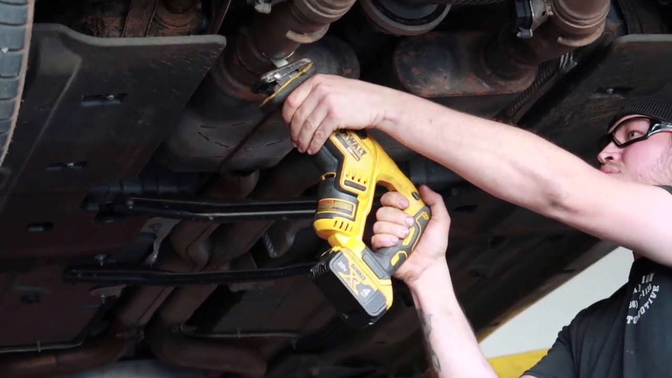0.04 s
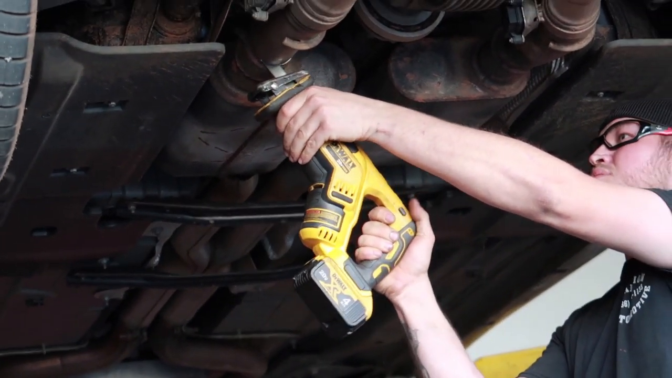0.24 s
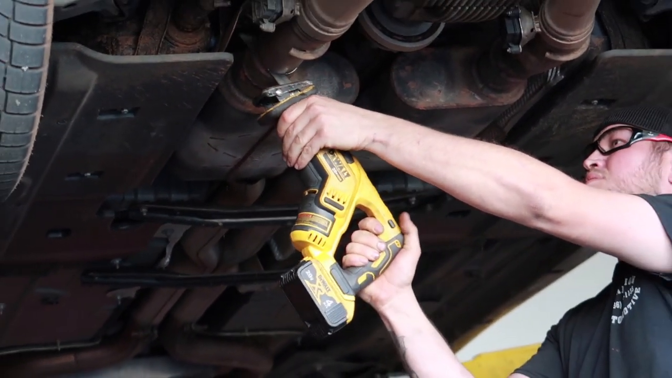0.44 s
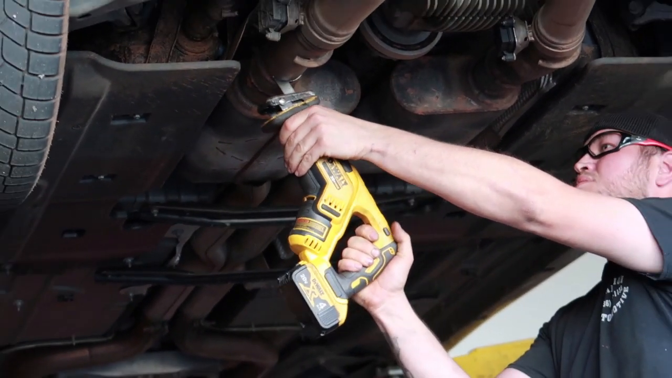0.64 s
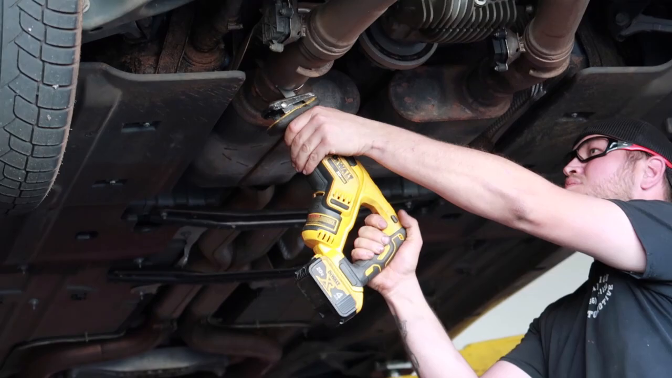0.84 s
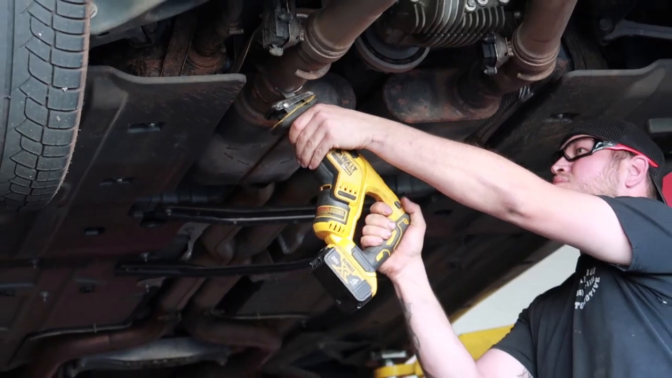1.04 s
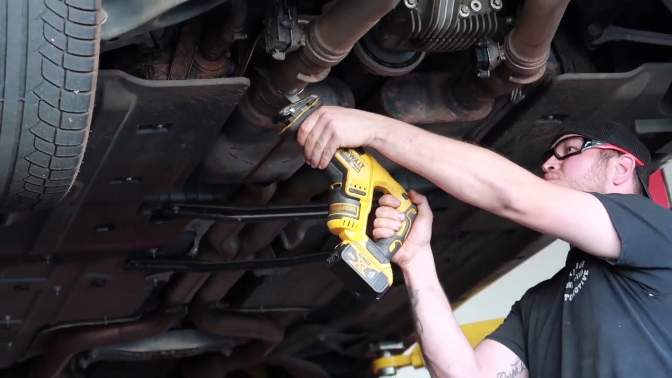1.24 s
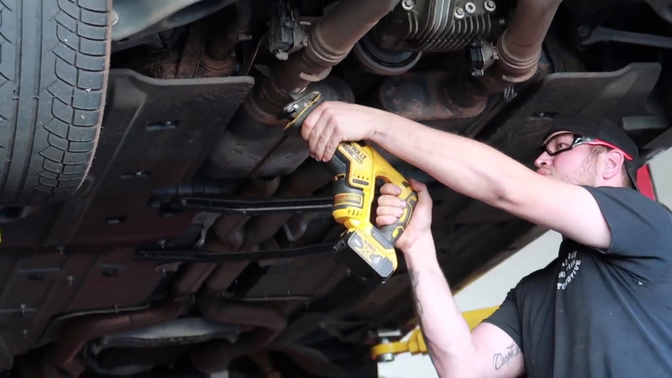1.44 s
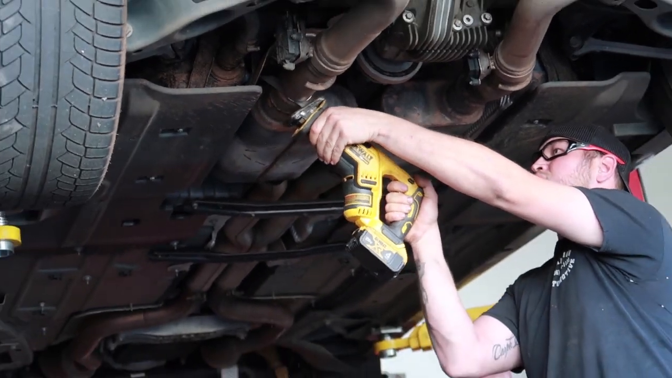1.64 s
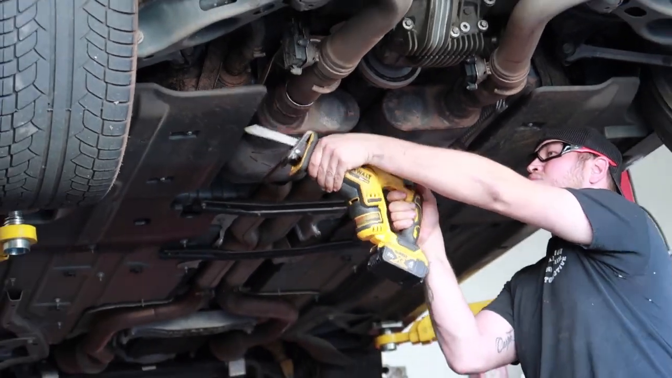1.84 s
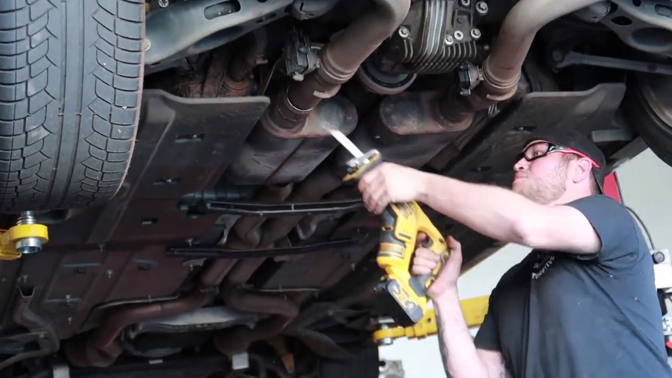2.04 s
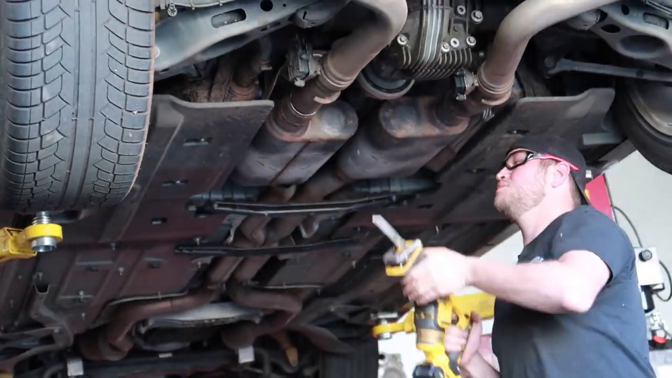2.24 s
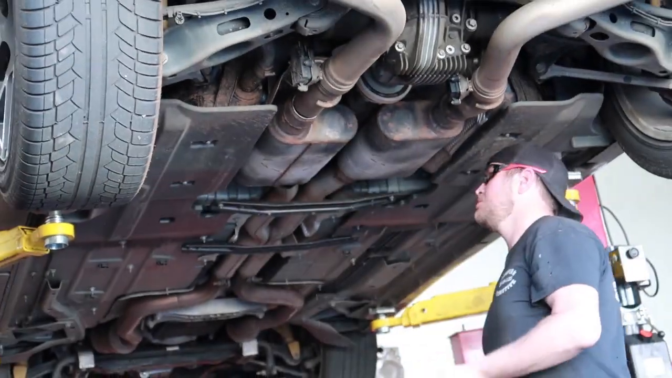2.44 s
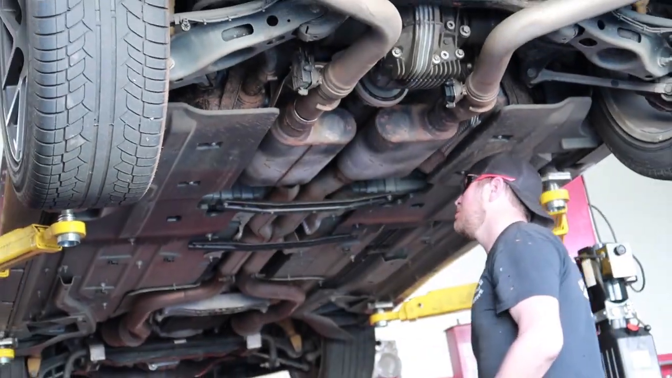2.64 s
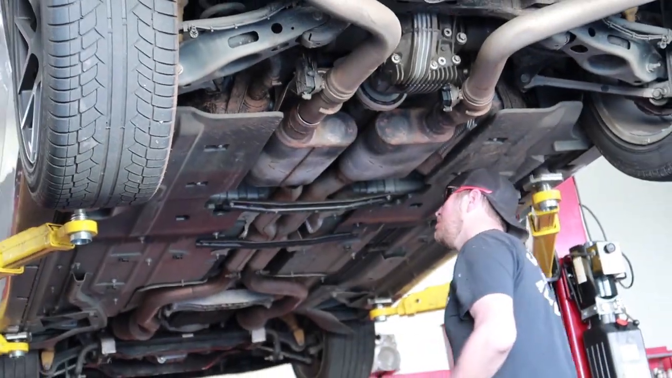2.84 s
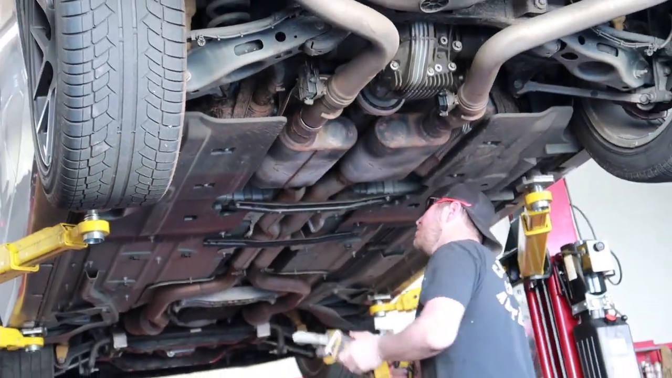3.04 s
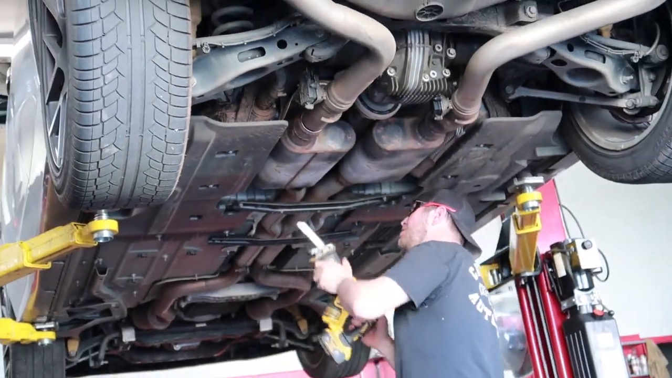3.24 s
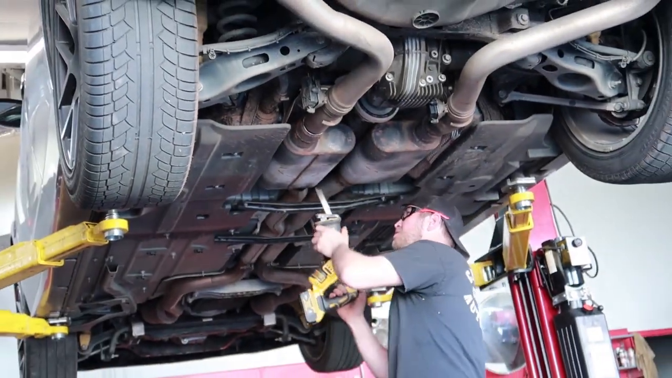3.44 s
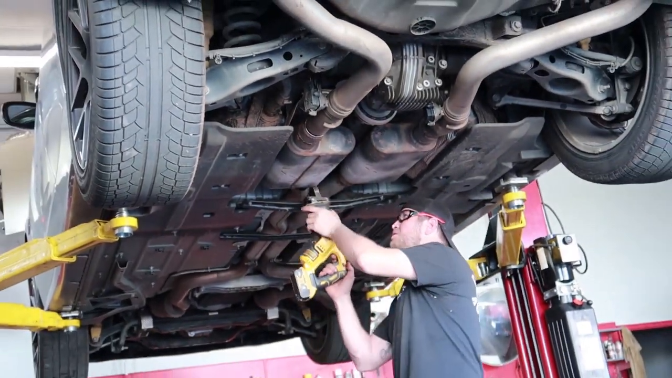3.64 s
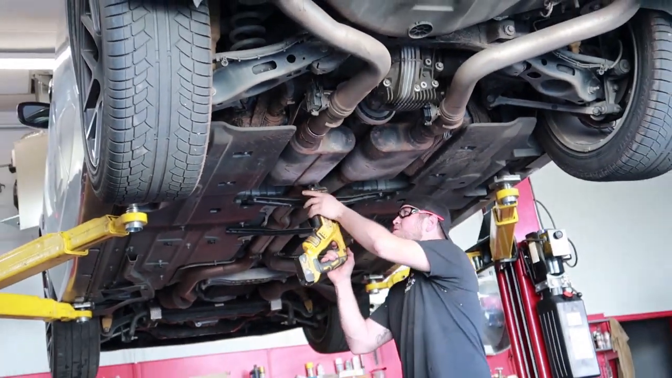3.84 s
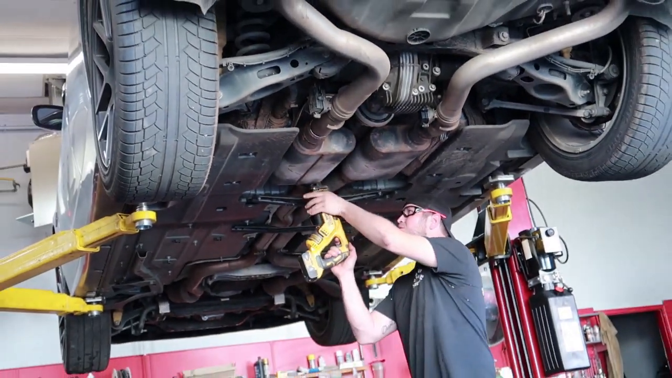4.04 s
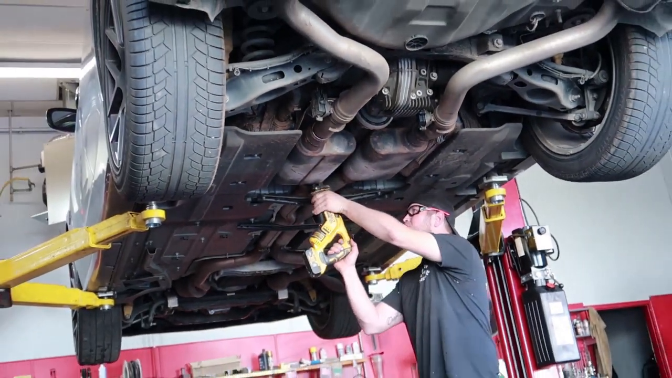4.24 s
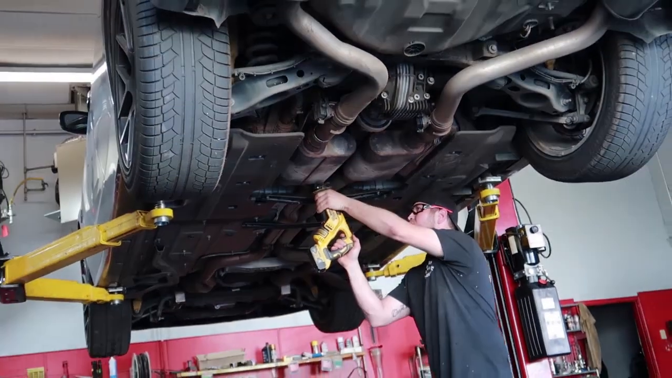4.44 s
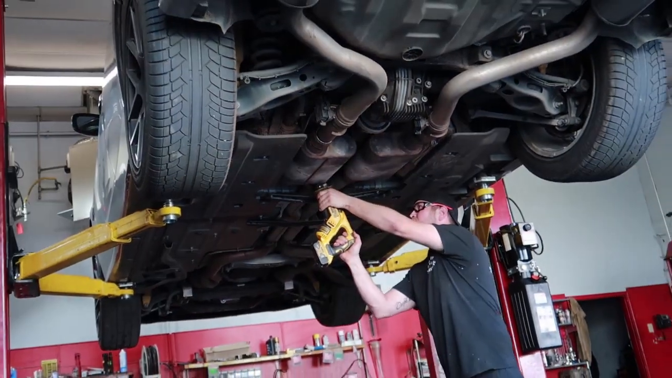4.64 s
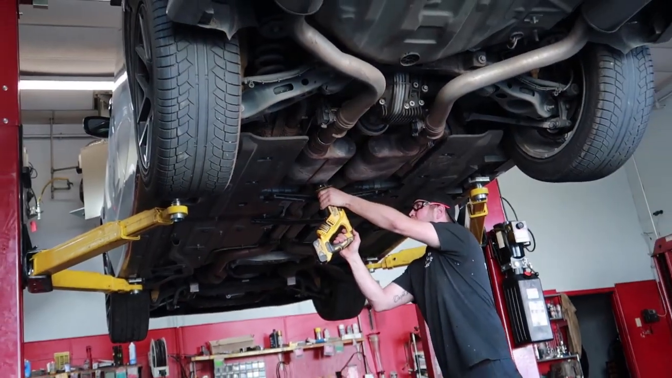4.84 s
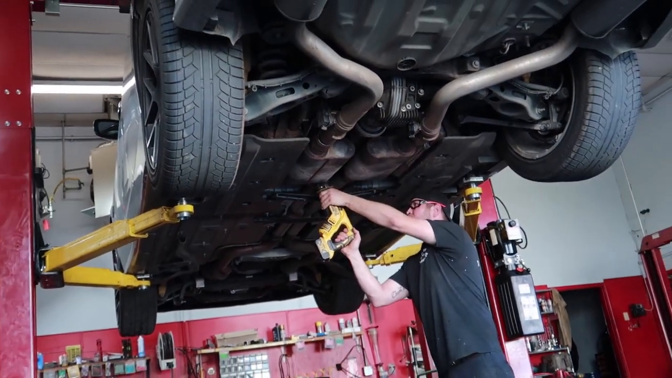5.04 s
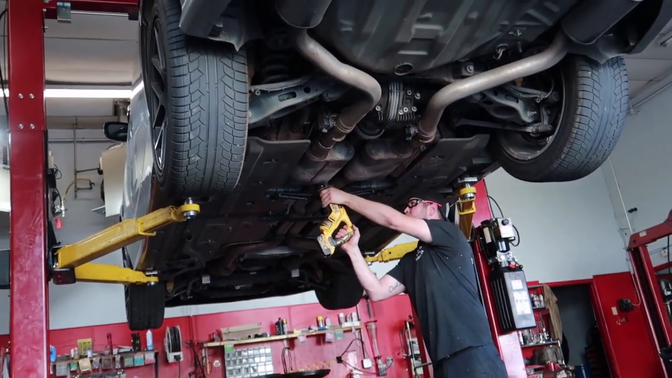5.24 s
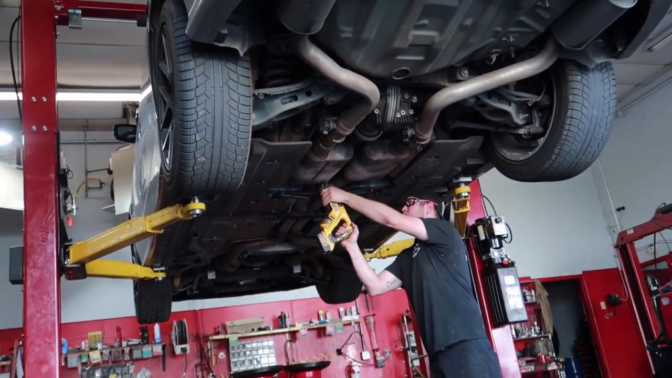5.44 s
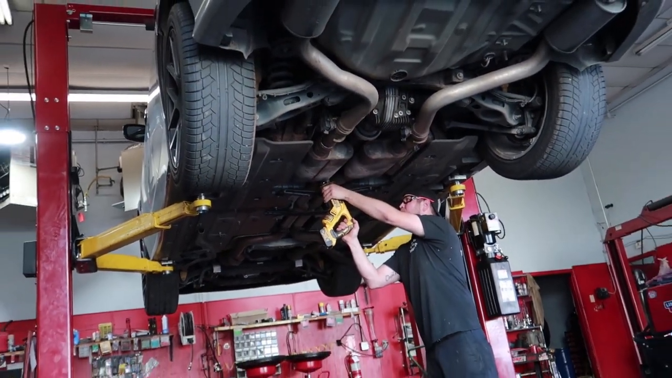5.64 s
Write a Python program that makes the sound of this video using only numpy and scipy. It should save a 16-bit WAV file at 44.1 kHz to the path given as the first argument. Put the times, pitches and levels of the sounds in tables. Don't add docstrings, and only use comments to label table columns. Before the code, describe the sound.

From 0 to about 1.85 s a reciprocating saw cuts a steel exhaust pipe at close range: a dense, harsh rasp strongest around 2 kHz, pulsing rapidly with the strokes at nearly 40 per second, with squealing catches, tiny skips, hollow pipe body and fine hiss. The car shudders faintly, and a ring near 1 kHz grows. At 1.9 s the pipe parts with slaps and two low knocks, swings and settles by 2.1 s as the saw stops; the metal ring fades over roughly a second. From 2.3 to 3.75 s a distant piston compressor dominates, chugging about 13 turns per second with low whine and air noise, gradually rising. At 3.8 s the blade lightly taps a second pipe, which rings briefly. Short, rough bites burst at 4.4-4.55 and 4.7-4.95 s, with low thuds and ringing gaps. From 5.25 s a new rasping cut builds and continues to the end.

```python
import sys
import numpy as np
from scipy import signal
from scipy.fft import rfft, irfft, next_fast_len
from scipy.io import wavfile
from scipy.ndimage import uniform_filter1d, map_coordinates

SR = 44100
rng = np.random.default_rng(int(sys.argv[2]) if len(sys.argv) > 2 else 0)


def to_wav(s):
    ch = np.atleast_2d(s).T
    pcm = np.round(np.clip(ch, -1, 1) * 32767)
    wavfile.write(sys.argv[1], SR, pcm.astype(np.int16))


def amplitude_ratio(level_db):
    exponent = np.asarray(level_db, float) / 20
    return 10 ** exponent


N = 251800
T = np.arange(N) / SR

# t/s, strokes done, pulsing share of the rasp (0-1)
STROKES = [
    (0, .68, .22),
    (.65, 25.65, .22),
    (1.05, 41.26, .15),
    (1.35, 53.06, .3),
    (1.9, 74.38, .22),
    (5.71, 221, .15),
]
# t/s, feed level/dB, tooth rate f/Hz, slack of the pipe (body over rasp) level/dB
FIRST_CUT = [(0, -17, 2248, -10), (.1, -18.5, 2222, -6), (.26, -19, 2200, -5.5), (.31, -20, 2160, -1),
             (.37, -17, 2200, -4.5), (0.499, -18, 2120, -5), (.62, -17, 1740, 0), (.72, -15, 2110, -9),
             (.83, -17, 1965, -7), (.95, -19.5, 2078, 2), (1.05, -16.5, 1990, -2.5),
             (1.19, -15.5, 1838, -10.5), (1.279, -21.5, 1855, -6.5), (1.36, -22, 2185, -4.5),
             (1.46, -19.5, 2200, -7), (1.57, -17.5, 2124, -4), (1.72, -19, 1880, -2),
             (1.83, -16.5, 1950, 4)]
RUN_OUT = [
    (1.83, -40, 1940, 6),
    (1.899, -27, 1918, 4),
    (1.999, -28.5, 1826, 0),
    (2.14, -31, 2121, 2),
]
TAP = [
    (3.778, -40, 2000, -5),
    (3.792, -23, 2020, -19),
    (3.82, -25.5, 1964, 0),
]
FIRST_BITE = [(4.33, -44, 1657, -1), (4.38, -32.5, 2040, 6), (4.413, -20, 1980, -1), (4.424, -15, 1960, 6),
              (4.46, -14.5, 1960, -2.5), (4.51, -16, 1850, -1), (4.54, -17, 1780, -2.5)]
SECOND_BITE = [(4.705, -34, 1700, 6), (4.734, -20, 1830, 3), (4.77, -16, 1900, 5), (4.8, -13.5, 1880, 5),
               (4.84, -13, 1760, -2), (4.878, -15.5, 1980, -8), (4.91, -11.5, 2180, -12.5),
               (4.955, -16, 1854, -9.5)]
SECOND_CUT = [(5.19, -40, 1916, -3), (5.23, -34, 1960, 0), (5.25, -23.5, 1942, 4), (5.33, -20, 1914, -1),
              (5.4, -18.5, 1986, -5.5), (5.48, -17.5, 2104, -5.5), (5.52, -14, 2152, -7),
              (5.6, -15.5, 2092, -9), (5.71, -14.5, 2090, -15)]
GRAZES = [
    [(3.771, -46, 2000, 0), (3.776, -28, 2000, 11), (3.784, -31, 2000, -7)],
    [(4.285, -61, 1660, 0), (4.293, -51, 1660, 0), (4.32, -48, 1660, -7)],
]
EDGE_DB = [
    0,
    1.3,
    -10.5,
    -2,
    -2.5,
    -2,
    2,
    9,
]
CONTACTS = [FIRST_CUT, RUN_OUT, TAP, FIRST_BITE, SECOND_BITE, SECOND_CUT] + GRAZES
# t/s, level/dB over the rasp
BINDING = [(0, -18), (.19, -32), (.24, -12), (.3, -10), (.42, -9), (.63, -21), (.88, -12), (1.07, -13),
           (1.28, -23.5), (1.8, -12.5), (3.8, -1.5), (4.42, -2.5), (4.55, -9), (4.75, -1.5), (4.95, -16),
           (5.3, -7.5), (5.5, -11), (5.71, -11)]
# f/Hz, width/Hz, level/dB
FIRST_PIPE = [(705, 18, -9), (830, 14, -14), (892, 14, -12), (991, 14, -9), (1140, 14, -9), (1230, 16, -8),
              (1265, 14, -8), (1314, 16, -10), (1500, 16, -9), (1560, 14, -8), (1740, 16, -5),
              (1840, 16, -6), (1965, 16, -5), (2035, 16, -3), (2110, 16, -6), (2170, 16, -4),
              (2198, 14, -2), (2236, 16, -2), (2278, 16, -2), (2435, 18, -6), (2530, 18, -7),
              (2575, 16, -4), (2800, 30, -9), (3420, 80, -14), (3850, 40, -17), (5340, 60, -19),
              (5670, 70, -17), (6130, 70, -21), (6550, 100, -23)]
SECOND_PIPE = [(684, 20, -8), (886, 18, -9), (1140, 16, -7), (1340, 16, -5), (1460, 18, -8), (1560, 16, -6),
               (1630, 18, -8), (1768, 16, -2), (1830, 16, -3), (1900, 16, -2), (1960, 16, -3),
               (2043, 16, -3), (2126, 16, -4), (2228, 16, -1), (2267, 16, -2), (2450, 30, -6),
               (3220, 60, -11), (3860, 60, -15), (4470, 40, -17), (4770, 40, -17), (6060, 70, -23)]
# f/Hz, density level/dB per Hz
RASP_SPECTRUM = [(240, -42), (400, -5.5), (586, -2), (694, -8.5), (761, -5), (1000, -4), (1060, -6),
                 (1300, -1), (1400, 4), (2220, -3), (4220, -24), (5470, -24), (11800, -31), (15500, -43)]
# t/s, half length/s, level/dB
SHUDDERS = [
    (0.102, 0.23, -47),
    (0.35, 0.15, -47),
    (.82, 0.36, -37),
    (1.409, 0.12, -46),
    (1.801, 0.23, -44),
]
# multiple, level/dB
SHAKE = [(2, -10), (3, -1.5), (5, -3.5)]
# share of the turn, level/dB
VALVES = [(0.122, 9), (0.431, 2), (0.733, 4.5), (0.9, -1)]
# f/Hz, width/Hz, level/dB
TANK = [(192, 16, -7), (258, 22, 0), (305, 22, 0), (357, 20, -5), (385, 16, -7), (600, 30, -13),
        (690, 40, -10), (1265, 60, -14)]
# f/Hz,
# density level/dB per Hz
SHOP_SPECTRUM = [(25, -18), (80, -7.5), (217, -4.5), (307, -2), (483, -17.5), (666, -12), (826, -18.5),
                 (1230, -13), (2250, -25.5), (2800, -23.5), (3150, -32.5), (4300, -38.5), (7500, -45),
                 (8800, -56), (9400, -46), (10000, -40.5), (10700, -46.5), (11300, -54)]
# f/Hz, level/dB re the machine's own level
WHINE = [(191.8, -14), (255.7, -8), (306.8, -8), (358, -13), (383.5, -16), (1265, -19), (1367, -22),
         (1852, -21)]
# t/s, f/Hz, level/dB, t60/s
SEVERED = [
    (1.1, 1800, -42, 0.65),
    (1.3, 1400, -48, 0.47),
    (2.09, 2156, -20, 0.25),
    (2.1, 824, -31.5, 0.7),
    (1.95, 988, -36.5, 4),
]
# t/s of the peak, peak level/dB, f/Hz
SNAGS = [(0.03, -17, 2240.0), (0.068, -11.5, 2210), (0.093, -10.5, 2270), (0.179, -18, 2200),
         (0.198, -23, 2230.0), (0.247, -19, 2210.0), (0.274, -15, 2200), (0.353, -11.5, 2190.0),
         (0.376, -11.5, 2280), (0.459, -16, 2210), (0.531, -12.5, 2200.0), (0.562, -15, 2200.0),
         (0.664, -12, 1970), (0.69, -13, 2190), (0.743, -12.5, 2230), (0.942, -15, 1235), (1.1, -8.5, 2150),
         (1.142, -8.5, 1684), (1.201, -8.0, 1882), (1.254, -14.5, 1953), (1.302, -15, 1720),
         (1.355, -12.5, 2213), (1.406, -13.5, 2220), (1.434, -20, 2210), (1.458, -17, 2210.0),
         (1.489, -15.0, 2220), (1.509, -11.0, 2120), (1.56, -12.5, 2074), (1.614, -12.5, 2210),
         (1.668, -23, 2176), (1.692, -16.5, 1745), (1.741, -18, 2200.0), (1.793, -14, 1258),
         (1.817, -11.5, 1240.0), (1.908, -18.5, 2250), (2.089, -23.5, 1633), (2.106, -20, 2150),
         (2.126, -26, 2170), (3.796, -24, 2015), (3.814, -25, 2030), (3.899, -28, 1360),
         (4.447, -9.5, 1837), (4.505, -11.5, 1465), (4.736, -16.0, 1250), (4.792, -10, 1141),
         (4.835, -14, 1820.0), (4.859, -7.5, 1853), (4.912, -13, 1830), (4.942, -6.5, 1830),
         (5.252, -23, 1325), (5.314, -19.5, 1320), (5.444, -14.5, 2058), (5.466, -14.0, 1960.0),
         (5.518, -10.5, 2270), (5.566, -16, 2250), (5.626, -9.5, 1940), (5.644, -12, 1900.0),
         (5.699, -7.0, 2120)]
# t/s, lost level/dB
SKIPS = [(0.075, -5.0), (0.206, -5.0), (0.335, -5.0), (0.647, -7.0), (0.757, -5.0), (0.878, -5.0),
         (1.162, -5.0), (1.182, -6.0), (1.34, -5.0), (1.378, -5.0), (1.417, -5.0), (1.469, -5.0),
         (1.53, -6.0), (1.65, -5.0), (1.703, -6.0), (4.373, -11.0), (4.395, -9.0), (4.413, -6.0),
         (4.706, -10.0), (4.725, -5.0), (4.765, -5.0), (4.865, -6.0), (4.934, -6.0), (4.986, -5.0),
         (5.237, -7.0), (5.297, -5.0), (5.49, -5.0), (5.535, -5.0), (5.658, -7.0), (5.709, -7.0)]
# t/s, peak level/dB
TICKS = [
    (1.8338, -21),
    (1.8966, -18),
    (1.962, -33),
    (1.9814, -33),
    (2.0105, -31),
    (3.868, -45),
    (4.2485, -54),
]
# t/s, peak level/dB, f/Hz
THUDS = [
    (1.899, -9, 355),
    (1.919, -8.5, 261),
    (1.959, -15.5, 285),
    (2.038, -20.5, 268.5),
    (2.089, -21.5, 244),
    (4.429, -32, 317.6),
    (4.761, -15, 332.6),
    (4.789, -26, 434),
    (4.899, -22, 353),
    (5.238, -19.5, 338.5),
]
# f/Hz, correlation
NEAR_ALIKE = [(60, 1.0), (120, 1.0), (240, 1), (480, 1), (950, 1), (1890, 0.96), (3770, 0.88), (7520, 0.47),
              (15000, 0.031)]
FAR_ALIKE = [(60, 1), (180, 1), (550, 0.98), (1650, 0.91), (4970, 0.21), (15000, -0.96)]

PARTS_S, SECOND_PIPE_S = 1.89, 3
SETTLES_S = SECOND_CUT[1][0]
USUAL_FEED_DB = -17
RASP_T60, BODY_T60, LOW_FIZZ_T60, HISS_T60, HIGH_FIZZ_T60 = 0.49, 0.92, 0.51, 0.14, 0.25


def unit(x):
    return x / np.sqrt(np.mean(x ** 2) + 1e-20)


def along(points, hz):
    f, v = np.transpose(points)
    return np.interp(np.log(hz + 1), np.log(f + 1), v)


def curves(rows):
    s, *columns = np.transpose(rows)
    return [np.interp(T, s, column) for column in columns]


def wobble(rate):
    coarse = np.arange(0, N + 16, 16)
    knots = rng.standard_normal(int(N * rate / SR) + 5)
    return np.interp(np.arange(N), coarse, map_coordinates(knots, [coarse * rate / SR]))


def filtered(x, response):
    m = next_fast_len(N + SR // 4)
    return irfft(rfft(x, m) * response(np.fft.rfftfreq(m, 1 / SR)), m)[..., :N]


def modes(table, f):
    total = 0
    for k, (centre, width, db) in enumerate(table):
        resonance = 1j * f * width / (centre ** 2 - f ** 2 + 1j * f * width)
        total = total + (-1) ** k * amplitude_ratio(db) * resonance
    return total


def band(f, lo_hz, hi_hz):
    return 1 / np.sqrt((1 + (lo_hz / (f + 1)) ** 8) * (1 + (f / hi_hz) ** 8))


def tail(t60):
    t = np.arange(round(t60 * SR)) / SR
    answer = rng.standard_normal(len(t)) * amplitude_ratio(-60 * t / t60)
    return answer / np.linalg.norm(answer)


def smeared(x, t60, hold):
    hop = round(hold * SR)
    padded = np.pad(x, (hop, 2 * hop))
    out = np.zeros(N + 4 * hop + SR)
    fade = np.sin(np.pi * np.arange(2 * hop) / (2 * hop))
    for start in range(0, N + hop, hop):
        answer = signal.fftconvolve(padded[start:start + 2 * hop] * fade, tail(t60))
        out[start:start + len(answer)] += answer
    return out[hop:hop + N]


def patchy(x, depth_db):
    z = signal.stft(x, nperseg=1024)[2]
    field = rng.standard_normal(z.shape)
    field = uniform_filter1d(uniform_filter1d(field, 5, 0), 12, 1)
    return signal.istft(z * amplitude_ratio(depth_db * unit(field)), nperseg=1024)[1][:N]


def evened(x):
    window_s, share = .03, .75
    power = np.abs(uniform_filter1d(x ** 2, round(window_s * SR))) + 1e-9
    return unit(x / power ** (share / 2))


def loudness(offset, t60):
    late_db, late_slower = -25, 2.3
    power = 0
    for rows, edge_db in zip(CONTACTS, EDGE_DB):
        s, feed_db, _, slack_db = np.transpose(rows)
        db = np.interp(T, s, offset(feed_db, slack_db, edge_db), left=-200)
        fall_db = 60 * np.maximum(T - s[-1], 0) / t60
        power = power + amplitude_ratio(db - fall_db) ** 2 + amplitude_ratio(db + late_db - fall_db / late_slower) ** 2
    return np.sqrt(power)


def contact():
    held_db, skip_s = -5, .005
    out = np.zeros(N + SR)
    t = np.arange(-SR // 40, SR // 40) / SR
    for s, db in [(s, held_db) for s, _, _ in SNAGS] + SKIPS:
        out[round(s * SR):][:len(t)] += db * np.exp(-(t / skip_s) ** 2)
    return out[SR // 40:][:N]


def chips(rough_db):
    return rng.standard_normal(N) * amplitude_ratio(np.clip(rough_db, 0, 3) * wobble(900))


def through_pipe(drive, lo_hz, hi_hz, ringing, patch_db):
    drive = patchy(drive, patch_db)
    wall = drive + 1.2 * smeared(drive, t60=.15, hold=.3)
    broad = unit(filtered(wall, lambda f: band(f, lo_hz, hi_hz) * amplitude_ratio(along(RASP_SPECTRUM, f))))
    strong = []
    for table in (FIRST_PIPE, SECOND_PIPE):
        inside = [mode for mode in table if lo_hz <= mode[0] < hi_hz]
        strong.append(unit(filtered(drive, lambda f: band(f, lo_hz, hi_hz) * modes(inside, f))))
    return np.cos(ringing) * broad + np.sin(ringing) * np.where(T < SECOND_PIPE_S, *strong)


def tooth_rasp(tooth_hz, fizz, pull, held):
    tooth_phase = 2 * np.pi * np.cumsum(tooth_hz * (1 + .03 * wobble(60))) / SR
    teeth = np.cos(tooth_phase) * wobble(520)
    rasp = through_pipe(.6 * teeth + chips(rough_db=2.5), 1450, 3050, ringing=.8, patch_db=1)

    def colour(f):
        tilt_db = -5.5 * np.log2(np.clip(f, 1000, 4000) / 2000)
        shoulder_db = 11 * np.exp(-((f - 2560) / 190) ** 2)
        return amplitude_ratio(tilt_db + shoulder_db)

    rasp = evened(filtered(rasp, colour))
    first_upper = evened(filtered(rasp + 0.69 * fizz, lambda f: band(f, 2450, 2900)))
    second_upper = evened(filtered(rasp + 0.69 * fizz, lambda f: band(f, 2600, 4600)))
    upper = np.where(T < SECOND_PIPE_S, first_upper, second_upper)
    return pull * (amplitude_ratio(0.94 * held) * rasp + amplitude_ratio(curves(BINDING)[0] + 0.65 * held) * upper)


def pipe_body(pull, held):
    body = pull ** .3 * through_pipe(chips(rough_db=2.5), 660, 1450, ringing=.8, patch_db=1.5)
    drum = unit(filtered(chips(rough_db=3.0), lambda f: band(f, 237, 820)))
    body = body + amplitude_ratio(-8.0) * (T > PARTS_S) * drum
    tilted = filtered(body, lambda f: amplitude_ratio(np.log2(np.clip(f, 600, 1500) / 1000)))
    return amplitude_ratio(0.25 * held) * evened(tilted)


def chip_hiss(pull):
    hiss = pull ** 0.33 * through_pipe(chips(rough_db=4.5), 10000, 19300, ringing=.05, patch_db=-0.5)
    duller = filtered(hiss, lambda f: band(f, 0.99, 13100) ** 2)
    return np.where(T < SECOND_PIPE_S, hiss, amplitude_ratio(1) * duller)


def locked_mode(feed_db, slack_db, pull, held):
    db = feed_db - 6.5 - 6.5 * T - 1.2 * (slack_db + 5)
    db = db + 1.5 * wobble(18) + 2 * wobble(45)
    phase = 2 * np.pi * np.cumsum(2200 + 12 * wobble(9)) / SR + .5 * wobble(40)
    return pull * amplitude_ratio(db + held) * np.sin(phase)


def car_shake(done, boom):
    shudder = sum(amplitude_ratio(db) * np.exp(-((T - s) / half) ** 2) for s, half, db in SHUDDERS)
    shake = sum(amplitude_ratio(db + 2.6 * wobble(11.8)) * np.sin(2 * np.pi * k * done) for k, db in SHAKE)
    rattle = unit(filtered(chips(rough_db=0.0), lambda f: band(f, 274, 460)))
    return shudder * (shake + amplitude_ratio(-0.5) * rattle + amplitude_ratio(-6) * boom)


def saw():
    feed_db, tooth_hz, slack_db = curves(FIRST_CUT + RUN_OUT[1:] + TAP + FIRST_BITE + SECOND_BITE + SECOND_CUT)
    done, depth = curves(STROKES)
    turn = 2 * np.pi * (done - .2)
    depth = np.clip(depth * amplitude_ratio(0.8 * wobble(23.3)), 0, .8)
    pull = 1 + depth * (np.cos(turn) - 0.093 * np.sin(2 * turn))
    held = contact()
    fizz = pull ** .3 * through_pipe(chips(rough_db=2.5), 3050, 7500, ringing=.28, patch_db=1.3)
    low_fizz = filtered(fizz, lambda f: 1 / (1 + (f / 4100) ** 6))

    def share_db(slack):
        return -10 * np.log10(1 + amplitude_ratio(slack) ** 2)

    def rasp_db(feed, slack, edge):
        return feed + share_db(slack)

    def body_db(feed, slack, edge):
        return feed + share_db(-slack)

    def fizz_db(feed, slack, edge):
        return edge + 0.13 * slack - 23.5 + 0.87 * (feed - USUAL_FEED_DB)

    def hiss_db(feed, slack, edge):
        return 2.3 * edge + 0.26 * slack - 36 + 0.99 * (feed - USUAL_FEED_DB)

    rasp = tooth_rasp(tooth_hz, fizz, pull, held)
    out = amplitude_ratio(-1.85 + 0.18 * wobble(7.9)) * rasp * loudness(rasp_db, RASP_T60)
    out = out + amplitude_ratio(0.65 * wobble(12)) * pipe_body(pull, held) * loudness(body_db, BODY_T60)
    whip_db = 8 * np.exp(-((T - 0.16) / 0.078) ** 2)
    fizz_gain = amplitude_ratio(whip_db - 1.2 * (T > SECOND_PIPE_S) + 1.86 * wobble(13))
    low_part = low_fizz * loudness(fizz_db, LOW_FIZZ_T60)
    high_part = (fizz - low_fizz) * loudness(fizz_db, HIGH_FIZZ_T60)
    out = out + fizz_gain * (low_part + high_part)
    out = out + amplitude_ratio(0.55 * wobble(15)) * chip_hiss(pull) * loudness(hiss_db, HISS_T60)
    hum = unit(filtered(chips(rough_db=-5.0), lambda f: modes([(339.2, 37.2, 0)], f) ** 2))
    out = out + amplitude_ratio(USUAL_FEED_DB - 19) * hum * np.clip((T - SETTLES_S) / 0.018, 0, 1)
    boom = unit(filtered(chips(rough_db=-1.0), lambda f: band(f, 45, 300)))
    out = out + amplitude_ratio(-41.5) * np.clip((T - SETTLES_S) / 0.16, 0, 1) * boom
    first_only = np.clip((1.95 - T) / 0.074, 0, 1)
    return out + first_only * (car_shake(done, boom) + locked_mode(feed_db, slack_db, pull, held))


def camera_gain():
    step, floor_db = 256, -13
    feed = loudness(lambda feed, slack, edge: feed, RASP_T60)
    loud = feed[::step] > amplitude_ratio(-27.5)
    gain_db = [floor_db]
    for rate in np.where(loud, -15.5, 8.5):
        gain_db.append(min(max(gain_db[-1] + rate * step / SR, floor_db), 0))
    return np.interp(np.arange(N), np.arange(len(gain_db)) * step, gain_db)


def compressor():
    crank_hz = 12.785
    knocks = np.zeros(N + SR)
    turns = np.arange(int(N / SR * crank_hz) + 1)
    for share, db in VALVES:
        chance = rng.standard_normal((len(turns), 2))
        when = (turns + share) / crank_hz + .00012 * chance[:, 0]
        knocks[np.round(np.abs(when) * SR).astype(int)] = amplitude_ratio(db + 2.7 * chance[:, 1])
    chug = unit(filtered(knocks[:N], lambda f: modes(TANK, f) * band(f, 195, 1700)))

    def noise(lo_hz, hi_hz):
        white = rng.standard_normal(N)
        return unit(filtered(white, lambda f: amplitude_ratio(along(SHOP_SPECTRUM, f)) * band(f, lo_hz, hi_hz)))

    air = amplitude_ratio(.8 * wobble(25)) * noise(230, 12700)
    rumble = noise(12, 128)
    whine = 0
    for hz, db in WHINE:
        whine = whine + amplitude_ratio(db + 1.5 * wobble(6)) * np.sin(2 * np.pi * hz * T + .3 * wobble(8))
    machine = amplitude_ratio(-27.5) * (amplitude_ratio(-7.0) * chug + amplitude_ratio(-3.0) * air + whine)
    return amplitude_ratio(camera_gain()) * (machine + amplitude_ratio(-33) * rumble)


def bell():
    wakes_s, full_s, early_share = 1, 1.88, 0.37
    swell = np.clip((T - wakes_s) / (full_s - wakes_s), early_share, 1)
    swell = swell * amplitude_ratio(-60 * np.maximum(T - full_s, 0) / 0.99)
    phase = 2 * np.pi * np.cumsum(985 + 6 * wobble(12)) / SR
    out = swell * amplitude_ratio(-27.5 + 2.5 * wobble(30)) * np.sin(phase)
    for s, hz, db, t60 in SEVERED:
        age = np.maximum(T - s, 0)
        level = amplitude_ratio(db - 60 * age / t60 + .6 * wobble(8.5)) * (1 - np.exp(-age / 0.032))
        out = out + level * np.sin(2 * np.pi * hz * age)
    return out


def snags():
    swell_s, let_go_s = .0055, .0027
    tones, spits = np.zeros((2, N + SR))
    t = np.arange(-SR // 40, SR // 40) / SR
    shape = np.exp(-(t / np.where(t < 0, swell_s, let_go_s)) ** 2)
    for s, db, hz in SNAGS:
        neighbour_hz = hz * rng.uniform(.85, 1.15)
        tone = np.sin(2 * np.pi * hz * t) + .35 * np.sin(2 * np.pi * neighbour_hz * t)
        tones[round((s + .001) * SR):][:len(t)] += amplitude_ratio(db) * shape * tone
        spits[round(s * SR):][:len(t)] += amplitude_ratio(db - 20) * shape * rng.standard_normal(len(t))
    for s, db in TICKS:
        decay = amplitude_ratio(db - 7.5 - 60 * np.abs(t) / 0.054) * (t > 0)
        spits[round(s * SR):][:len(t)] += decay * rng.standard_normal(len(t))
    inside = slice(SR // 40, SR // 40 + N)
    fizz = filtered(spits[inside], lambda f: band(f, 3100, 12500) * amplitude_ratio(along(RASP_SPECTRUM, f) + 28.5))
    return tones[inside] + fizz


def thuds():
    out = np.zeros(N + SR)
    t = np.arange(SR // 5) / SR
    for s, db, hz in THUDS:
        knock = np.sin(2 * np.pi * hz * t) + 3 * rng.standard_normal(len(t))
        out[round(s * SR):][:len(t)] += amplitude_ratio(db - 5.5 - 60 * t / 0.18) * (1 - np.exp(-t / 0.0016)) * knock
    return filtered(out[:N], lambda f: band(f, 59, 900))


def spread(x, alike, t60):
    echo = smeared(x, t60, hold=.06)

    def share(f):
        angle = np.arccos(np.clip(along(alike, f), -1, .992)) / 2
        return np.array([np.cos(angle), np.sin(angle)])

    mid, side = filtered(np.array([x, echo]), share)
    return np.array([mid + side, mid - side])


def scene():
    near = spread(saw() + snags() + thuds() + bell(), NEAR_ALIKE, t60=.1)
    far = spread(compressor(), FAR_ALIKE, t60=.15)
    thinned = 1 - np.clip((T - 1.9) / .05, 0, 1) + np.clip((T - 4.86) / .05, 0, 1)
    bass = filtered(far, lambda f: band(f, 0.92, 290))
    return near * amplitude_ratio([[-.2], [.2]]) + far - thinned * (1 - amplitude_ratio(-6)) * bass


def top_cut(x):
    return signal.sosfilt(signal.butter(12, 15640, fs=SR, output="sos"), x)


def record(dry):
    rounded = dry / (1 + np.abs(dry / .9) ** 6) ** (1 / 6)
    return top_cut(rounded)


dry = scene()
out = record(dry)
to_wav(out)
```